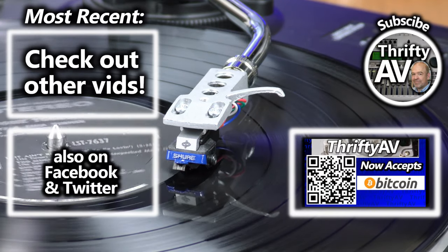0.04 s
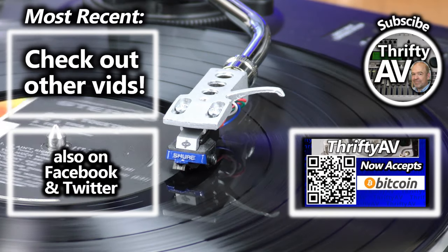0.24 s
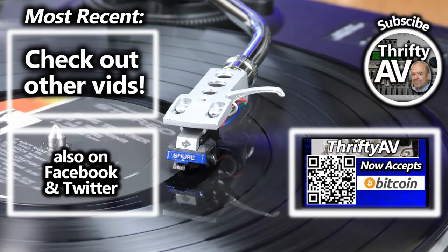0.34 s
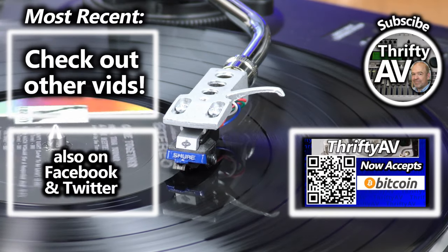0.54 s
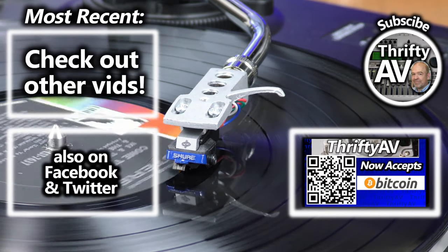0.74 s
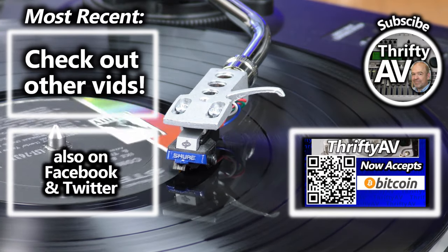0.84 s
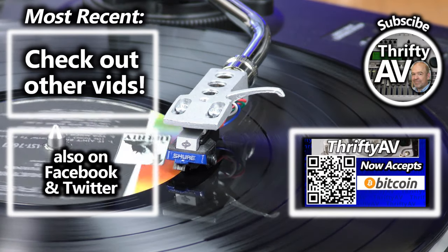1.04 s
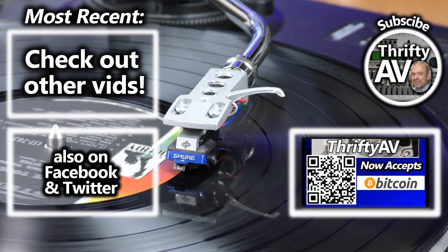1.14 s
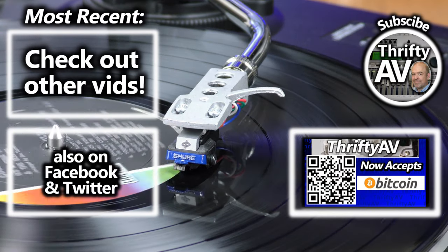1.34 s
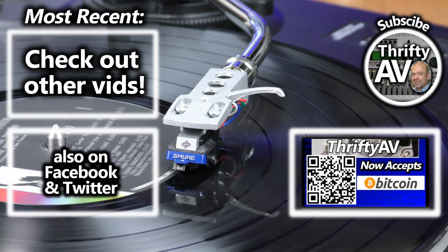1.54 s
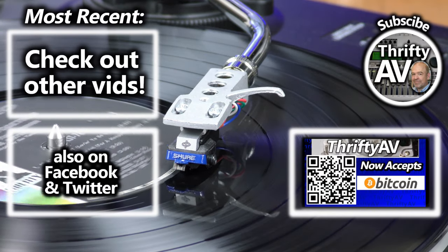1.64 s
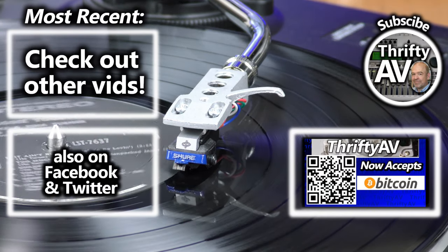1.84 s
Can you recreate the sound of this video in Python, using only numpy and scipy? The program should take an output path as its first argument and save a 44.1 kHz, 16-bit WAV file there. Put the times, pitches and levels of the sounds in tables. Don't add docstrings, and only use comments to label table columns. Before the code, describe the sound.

Crackle of a dusty record groove through a loudspeaker in a small room. Small ticks scatter from the start; at 0.33 s a tiny scratch meets a deep, boxy thump, then the loudest sharp pop at 0.4 s. Ticks continue to 0.74 s, a sparser gap lasts until 1.06 s, softer thumps cluster around 1.26-1.36 s, and pops thin out by 1.76 s over faint hiss, rumble and hum.

```python
import sys
import numpy as np
from scipy import signal
from scipy.io import wavfile

SR = 44100
rng = np.random.default_rng(int(sys.argv[2]) if len(sys.argv) > 2 else 0)


def to_linear_factor(level_db):
    exponent = np.asarray(level_db, float) / 20
    return 10 ** exponent


def wrap_up_sound(samples):
    columns = np.atleast_2d(samples).T
    tamed = np.clip(columns, -1, 1)
    steps = np.round(tamed * 32767).astype(np.int16)
    wavfile.write(sys.argv[1], SR, steps)


N = 81585
HISS_CUT_HZ = 15900


def rms_one(x):
    return x / np.sqrt(np.mean(x ** 2) + 1e-20)


def at_hz(points, hz):
    points = np.array(points)
    return np.interp(np.log(hz), np.log(points[:, 0]), points[:, 1])


def drift(rate):
    r = np.exp(-80 * np.pi * rate / SR)
    noise = rng.standard_normal(N // 40 + 2002)
    slow = signal.lfilter([1], [1, -2 * r, r * r], noise)[2000:]
    return np.interp(np.arange(N) / 40, np.arange(len(slow)), rms_one(slow))


def clicks(s, sizes):
    return np.bincount((np.asarray(s) * SR).astype(int), sizes, N + SR)[:N] + 1e-18


def late(x, s):
    return np.interp(np.arange(N) - s * SR, np.arange(N), x, left=0)


def ring(x, hz, t60):
    r = to_linear_factor(-60 / (t60 * SR))
    w = 2 * np.pi * hz / SR
    return signal.lfilter([0, np.sin(w)], [1, -2 * r * np.cos(w), r * r], x)


def butter(x, order, hz, kind="low"):
    return signal.sosfilt(signal.butter(order, hz, kind, fs=SR, output="sos"), x)


def bands(level):
    # f/Hz, likeness (1 = the same, 0 = unrelated)
    likeness = [(60, 0.86), (250, 0.94), (500, 0.68), (2000, .6), (4000, .45), (8000, 0.033),
                (12000, 0.0082)]
    out = 0
    edges = 25 * 2 ** np.arange(0, 9.4, 1 / 3)
    white = rng.standard_normal((2, 2, N))
    for k, (low, high) in enumerate(zip(edges, edges[1:])):
        centre = np.sqrt(low * high)
        mid, side = butter(white[k % 2], 2, [low, high], "band")
        alike = np.clip(at_hz(likeness, centre), -1, 1)
        stereo = np.sqrt(1 + alike) * mid + np.sqrt(1 - alike) * side * [[1], [-1]]
        out = out + level(centre) * stereo
    return out


def hum():
    # f/Hz, rms level/dB
    tones = [(59.2, -66.5), (118.4, -68)]
    t = np.arange(N) / SR
    return sum(np.sqrt(2) * to_linear_factor(db - 1.5 * drift(2)) * np.sin(2 * np.pi * hz * t) for hz, db in tones)


def rumble(groove_db):
    # f/Hz, level/dB
    colour = [(15, -33), (25, -25), (119, 0.5), (186, -9), (375, -3), (897, -12.5), (1060, -4.5),
              (1500, -37.5), (1950, -49), (3300, -120)]
    level_db, follows_groove = -62, 0.31
    noise = rms_one(bands(lambda hz: (hz < 1500) * to_linear_factor(at_hz(colour, hz) + 2.5 * drift(8))))
    return to_linear_factor(level_db + follows_groove * (groove_db - groove_db.mean())) * noise


def groove_hiss(groove_db):
    # f/Hz, level/dB
    colour = [(700, -18), (1200, 13.5), (1800, 3), (2900, 3.5), (4600, 9), (6500, -2), (10500, 3),
              (14800, -10.5)]
    together = drift(15)
    noise = rms_one(bands(
        lambda hz: (hz > 600) * to_linear_factor(at_hz(colour, hz) + 1.5 * together + 1.2 * drift(15))))
    noise = signal.sosfilt(signal.cheby2(10, 40, HISS_CUT_HZ, fs=SR, output="sos"), noise)
    return to_linear_factor(groove_db) * noise


def room(x):
    # f/Hz, level/dB
    tail_level = [(100, -6.5), (300, 1), (600, 2.5), (900, 10.5), (1250, -6), (2000, -1.5), (4500, -2.5),
                  (11000, -10)]
    # f/Hz, t60/s
    tail_t60 = [(150, 0.32), (400, 0.32), (1040, 0.31), (2760, 0.083), (7280, 0.33)]
    level_db, rise_s = -8, 0.002
    t = np.arange(N) / SR
    tail = bands(lambda hz: to_linear_factor(at_hz(tail_level, hz) - 60 * t / at_hz(tail_t60, hz)))
    tail = tail * (1 - np.exp(-(t / rise_s) ** 2))
    tail = to_linear_factor(level_db) * tail[:, :SR // 2] / np.sqrt(np.sum(tail ** 2) / 2)
    return signal.fftconvolve(tail, x[None])[:, :N]


def dents():
    # t/s, level/dB, push length/s
    dent_list = [(0.3373, -20.5, 0.0037), (1.2618, -30.5, 0.004), (1.2745, -32, 0.0048),
                 (1.292, -34, 0.00523), (1.317, -40, 0.0045), (1.356, -39.5, 0.0036), (.005, -47.5, 0.0047),
                 (.09, -48, 0.0062), (0.122, -52.5, 0.0055), (.17, -48.5, 0.0045), (.265, -46.5, 0.0055),
                 (0.342, -35, 0.0015), (.5, -53, 0.0073)]
    # f/Hz, level/dB, t60/s
    bass = [(118, -15, 0.29), (141.9, -5.5, 0.2), (165.5, -12, 0.04), (224.7, -13.5, 0.04),
            (288, -28, 0.14), (405, -22.5, 0.088)]
    knock_db, knock_hz, knock_t60_s = -7.5, 475, 0.019
    t = np.arange(N) / SR
    out = np.zeros(N)
    for s, db, length in dent_list:
        u = (t - s - length / 4) / length
        push = to_linear_factor(db) * np.exp(-(1.6 * u) ** 2) * np.cos(2 * np.pi * u - .4)
        knock = to_linear_factor(knock_db) * ring(clicks([s], [to_linear_factor(db)]), knock_hz, knock_t60_s)
        out += push + knock
    return out + sum(to_linear_factor(db) * ring(out, hz, t60) * hz / SR * 4 for hz, db, t60 in bass)


def speaker(tick, boxy, body):
    # f/Hz, level/dB, t60/s
    cavity = [(2056, -18.5, 0.0047), (3567, -30, 0.0053), (4838, -11, 0.0024), (5566, -9, 0.002),
              (7030, -10.5, 0.0022), (7830, -15.5, 0.0085), (8670, -21.5, 0.014), (9610, -16, 0.0058),
              (10550, -20.5, 0.0067)]
    # delay/s, gain
    echoes = [(.00088, .3), (.00101, -.75), (.0034, -.35)]
    tick_cut_hz, tick_db, snap_db = 18600, -1.5, -4.5
    blunt_cut_hz, blunt_db, tweeter_from_hz = 3400, -3.5, 904
    ring_hz, ring_t60_s, ring_start_s, ring_db, ring_stop = 1230, .08, .00088, 3, .8
    body_hz, body_t60_s, body_db = 287, 0.016, 11.5

    sharp = butter(tick, 2, tick_cut_hz) * SR / tick_cut_hz / 2
    blunt = butter(boxy, 2, blunt_cut_hz) * SR / blunt_cut_hz / 2
    snap = butter(sharp + to_linear_factor(blunt_db) * blunt, 1, tweeter_from_hz, "high")
    cavity_ring = sum(to_linear_factor(db) * ring(snap, hz, t60) for hz, db, t60 in cavity)
    snap = to_linear_factor(tick_db) * (to_linear_factor(snap_db) * snap + cavity_ring)
    reflected = sum(gain * late(snap, s) for s, gain in echoes)

    box = to_linear_factor(ring_db) * late(ring(boxy, ring_hz, ring_t60_s), ring_start_s)
    box = box - ring_stop * late(box, 3 / ring_hz)
    return snap + reflected - box - to_linear_factor(body_db) * ring(body, body_hz, body_t60_s)


def fine_crackle(groove_db):
    level_db, per_s = 3, 300
    sizes = to_linear_factor(3.83 * np.minimum(rng.exponential(1, N), 3)) * rng.choice([-1, 1], N)
    chance = per_s * to_linear_factor(groove_db - groove_db.mean() + 5 * drift(8)) / SR
    return to_linear_factor(groove_db + level_db) * sizes * (rng.random(N) < chance)


def scratch():
    start_s, length_s, level_db = .323, .0145, -37.5
    swell = np.clip((np.arange(N) / SR - start_s) / length_s, 0, 1)
    ticks = rng.standard_normal(N) * (rng.random(N) < 5000 / SR)
    return to_linear_factor(level_db) * ticks * swell ** 1.5 * (swell < 1)


def dust(groove_db):
    # t/s, tick level/dB, box ring level/dB and body level/dB (both against the tick)
    specks = [(0.0818, -43, -5, -16), (0.0918, -46.5, -15, -31), (0.1064, -94, 2, -7),
              (0.1095, -37, -33, -21.5), (0.121, -44, -12, -17), (0.1318, -45.5, -7, -8),
              (0.1405, -39.5, -34, -17), (0.2028, -61, -36, -22), (0.2244, -35.5, -4, -18),
              (0.2888, -44.5, -10, -17), (0.379, -46, -12, -24), (0.4, -24.5, -13.5, -21.5),
              (0.4261, -37.5, -12, -27), (0.5058, -42, -35, -20), (0.5787, -32, -11.5, -26),
              (0.631, -43, -32, -17), (0.6657, -34, -15, -15.5), (0.7365, -39, 1.5, -10),
              (1.06, -35.5, -18.5, -46), (1.1, -34, -26, -30), (1.1471, -41.5, -25, -14.5),
              (1.3471, -32, -20, -16.5), (1.4082, -43, -3.5, -15.5), (1.454, -32.5, -4.5, -10.5),
              (1.4592, -47, 4, -44), (1.5541, -34.5, -7.5, -20), (1.5646, -39.5, -2.5, -17),
              (1.5793, -45.5, -8.5, -19), (1.6707, -41.5, -14, -23), (1.7577, -40, -5, -19.5)]
    arrival_s, edge_s, edge_share, scratch_ring_db = .0014, .00025, .5, -10
    s, db, ring_db, body_db = np.transpose(specks)
    s = s + arrival_s
    fine = fine_crackle(groove_db)
    scrape = scratch()
    lag, share = rng.random((len(s), 2)).T
    edge = clicks(s + edge_s * lag, edge_share * (2 * share - 1) * to_linear_factor(db))
    tick = clicks(s, to_linear_factor(db)) + edge + fine + scrape
    boxy = clicks(s, to_linear_factor(db + ring_db)) + 0.13 * fine + to_linear_factor(scratch_ring_db) * scrape
    body = clicks(s, to_linear_factor(db + body_db)) + 0.1 * fine
    return speaker(tick, boxy, body)


def scene():
    # t/s, level/dB
    roughness = [(0, -57.5), (0.052, -67), (.13, -58), (0.202, -65), (0.299, -61), (0.348, -54),
                 (0.449, -58), (0.549, -63), (0.702, -60), (0.851, -66), (0.968, -64.5), (1.151, -62.5),
                 (1.289, -63.5), (1.33, -69.5), (1.471, -62), (1.65, -71), (1.85, -70)]
    left_lift_db, lift_from_hz, lift_to_hz = 5.5, 890, 6340
    side_top = 0.2
    groove_db = np.interp(np.arange(N) / SR, *np.transpose(roughness))
    direct = dust(groove_db) + dents()
    mids = butter(direct, 1, [lift_from_hz, lift_to_hz], "band")
    top = butter(direct, 2, lift_to_hz, "high")
    lift = (to_linear_factor(left_lift_db / 2) - 1) * mids * [[1], [-1]]
    glance = side_top * late(top, .0002) * [[-.6], [1]]
    noise_floor = groove_hiss(groove_db) + rumble(groove_db) + hum()
    return direct + lift + glance + room(direct) + noise_floor


def low_pass(x):
    return signal.sosfilt(signal.butter(12, 16400, fs=SR, output="sos"), x)


def record(dry):
    treble_right_db, treble_hz = 4, 9600
    top_hz, top_loss_db, low_cut_hz, cutoff_hz = 10650, -8, 55, 16600
    air_db, air_from_hz = -84.5, 11500
    high = signal.sosfiltfilt(signal.butter(2, treble_hz, "high", fs=SR, output="sos"), dry)
    x = dry + high * (to_linear_factor(treble_right_db / 2) - 1) * [[-1], [1]]
    low = signal.sosfiltfilt(signal.butter(8, top_hz, fs=SR, output="sos"), x)
    x = low + to_linear_factor(top_loss_db) * (x - low)
    air = butter(rng.standard_normal((2, N)), 6, [air_from_hz, HISS_CUT_HZ - 500], "band")
    x = x + to_linear_factor(air_db + 2.0 * drift(5)) * rms_one(air)
    x = butter(x, 4, low_cut_hz, "high")
    x = signal.sosfilt(signal.cheby2(12, 50, cutoff_hz, fs=SR, output="sos"), x)
    return low_pass(x)


dry = scene()
out = record(dry)
wrap_up_sound(out)
```